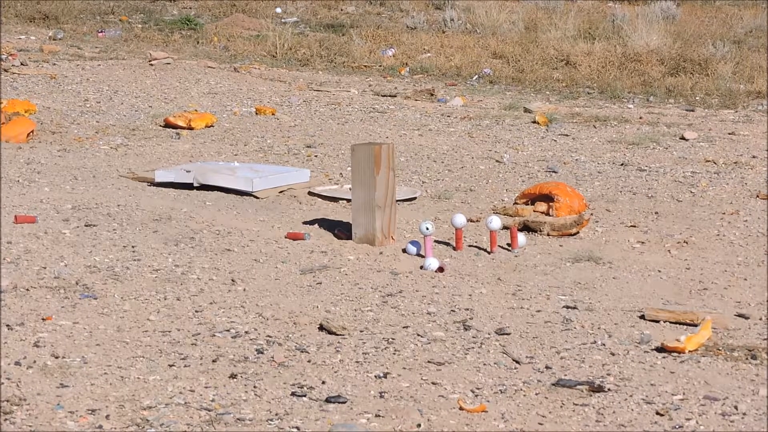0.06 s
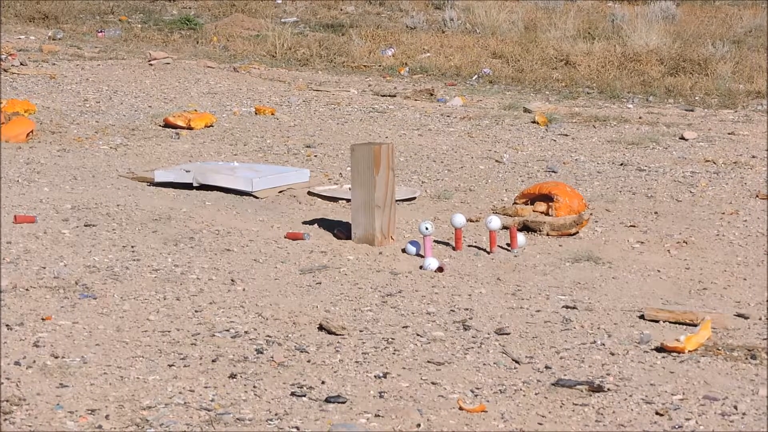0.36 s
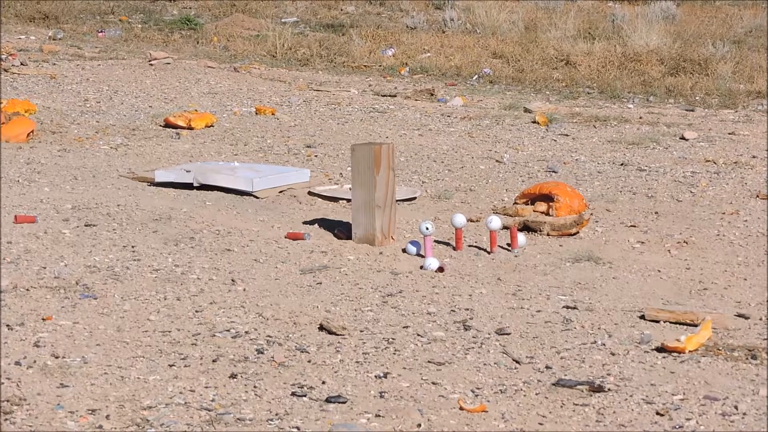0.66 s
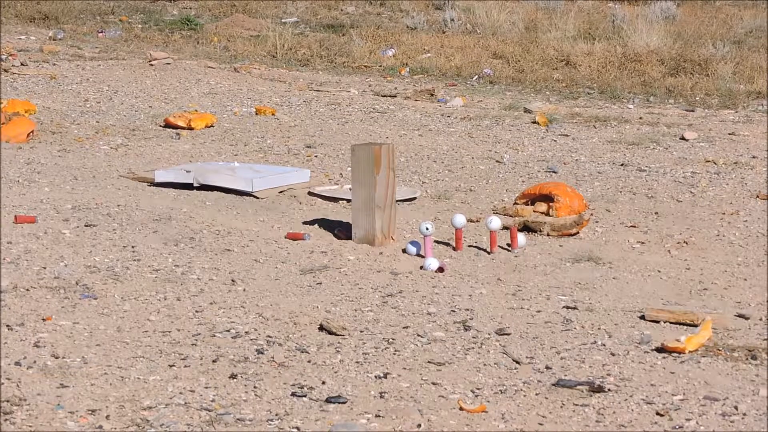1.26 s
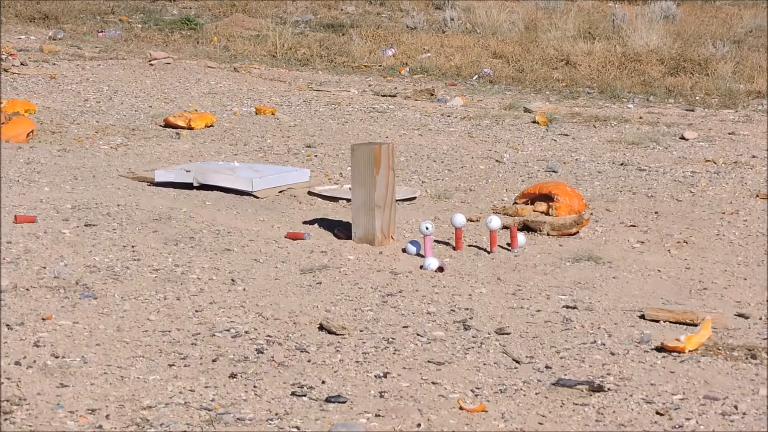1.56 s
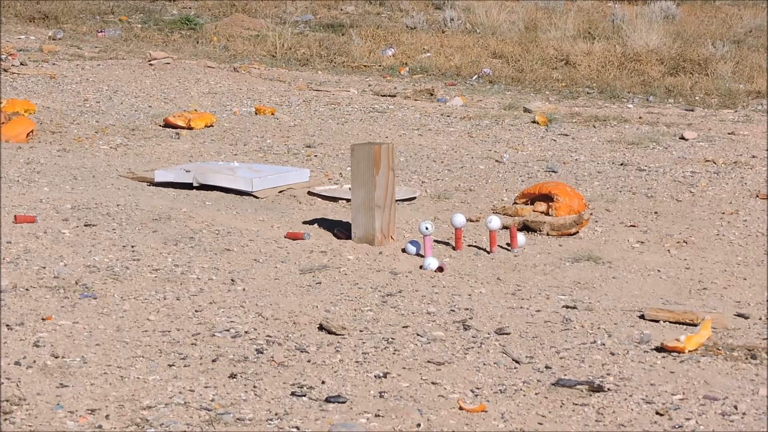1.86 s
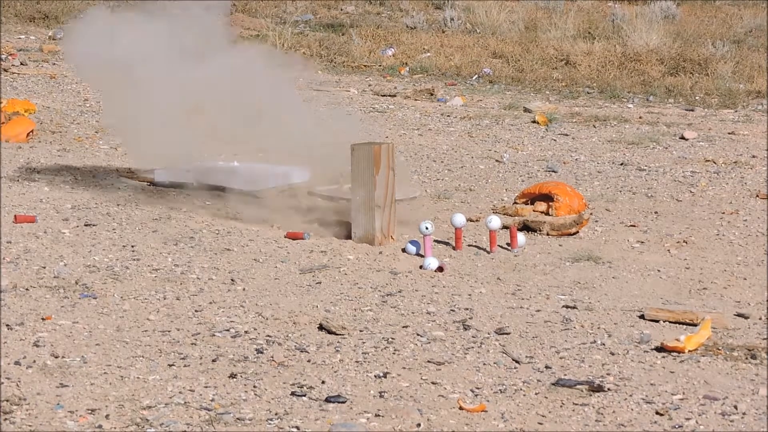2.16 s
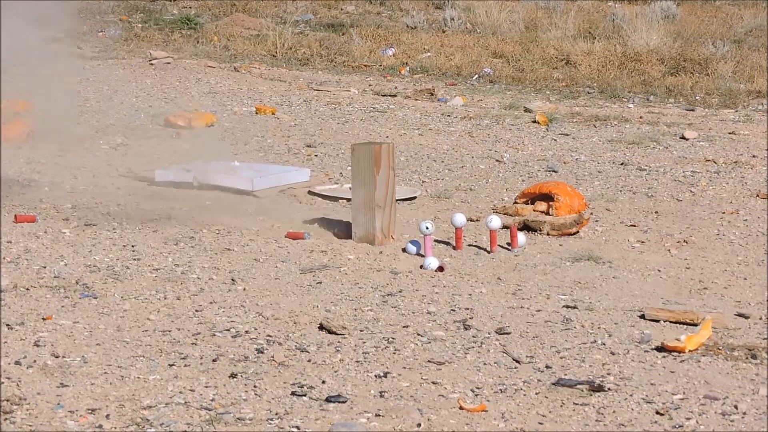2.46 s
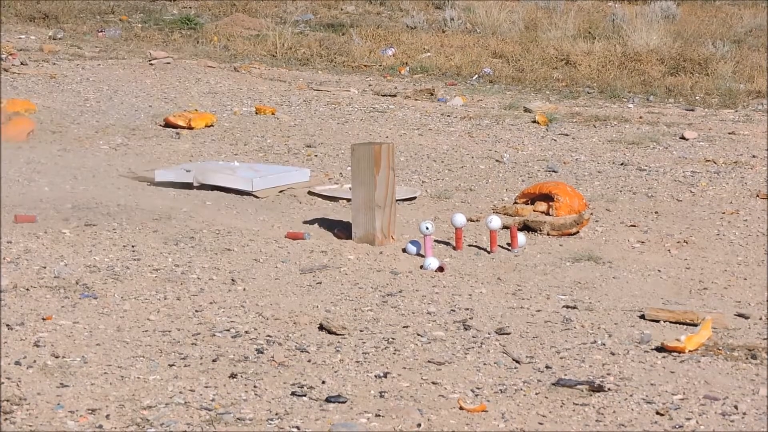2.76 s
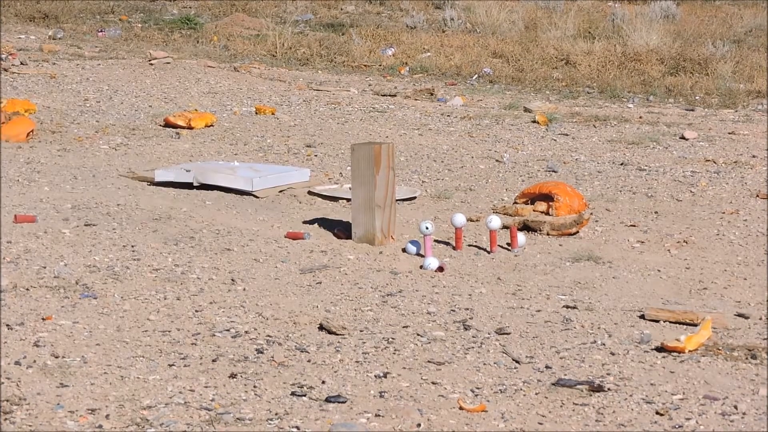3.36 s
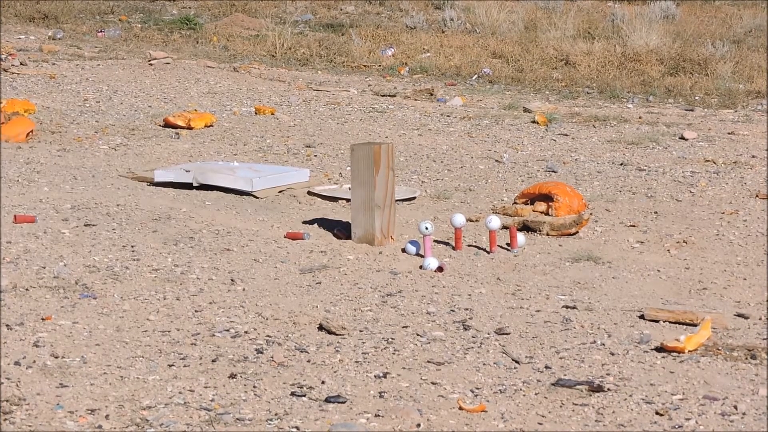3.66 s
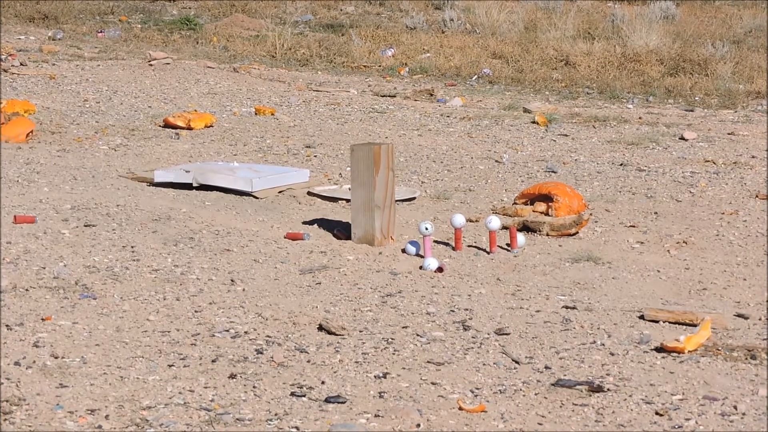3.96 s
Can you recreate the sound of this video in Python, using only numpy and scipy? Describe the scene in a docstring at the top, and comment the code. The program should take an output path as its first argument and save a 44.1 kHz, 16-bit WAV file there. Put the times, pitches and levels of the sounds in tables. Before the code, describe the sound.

A single sharp gunshot cracks outdoors, with wind buffeting the microphone and a brief ricochet whine.

```python
"""One gunshot on an open dirt range, with wind buffeting both microphone ports.
It opens in slow motion, a deep muffled rumble, and after a short gap clicks into full-speed wind.
At about 2 s the blast's pressure wave overloads the microphone, and the hit cracks in the dirt.
The ground reverberates, tumbling fragments whine away and grit ticks down. The slopes return
ever duller echoes, and the wind crackles on to the end."""
import sys
import numpy as np
from scipy import signal
from scipy.fft import rfft, irfft
from scipy.io import wavfile

SR = 44100
rng = np.random.default_rng(int(sys.argv[2]) if len(sys.argv) > 2 else 0)


def master_out(mix):
    """Clip the mix to full scale and print it as 16-bit PCM to the path in sys.argv[1]."""
    frames = np.transpose(np.atleast_2d(mix))
    ceiling = np.clip(frames, -1, 1)
    pcm = np.round(ceiling * 32767).astype(np.int16)
    wavfile.write(sys.argv[1], SR, pcm)


N = 176400
T = np.arange(N) / SR
FREQS = np.maximum(np.arange(N // 2 + 1) * SR / N, 1)
SLOW_END_S, FULL_SPEED_S = 1.597, 1.63
SHOT_S, IMPACT_S = 2.0557, 2.0772

# hiss of the open air: frequency_hz, density_db
HISS_SPECTRUM = [(1000, -92), (3000, -102), (10000, -110.5), (15500, -117)]
# slowed air at the left and right port: frequency_hz, density_db
SLOW_LEFT_SPECTRUM = [(22, -44), (48, -67.5), (160, -74), (400, -90.5), (1700, -101), (4000, -135)]
SLOW_RIGHT_SPECTRUM = [(20, -24), (38, -37.5), (65, -64), (110, -70), (400, -85.5), (2300, -107),
                       (4000, -135)]
# swell of the slowed rumble on the right: time_s, gain_db
SLOW_RIGHT_GAIN = [(.68, -6), (.76, 4), (1.1, -3)]
# slowed, dull ticks: start_s, level_db, decay_s
DULL_TICKS = [(.718, -54, .004), (0.801, -58, .008), (1.378, -45, 0.016), (1.540, -55.5, 0.0045)]
# their resonances: frequency_hz, gain_db
DULL_TICK_COLOUR = [(250, -14.5), (520, 4.5), (750, -10), (1650, -0.5), (2000, -15.5), (2800, -42.5)]
# turbulence at relative speed 1, before each port's gain: frequency_hz, density_db
WIND_SPECTRUM = [(15, -47), (80, -36.5), (190, -38.5), (450, -47), (700, -63.5), (1000, -75), (1500, -94.5),
                 (4000, -130)]
# wind at each port: time_s, relative_speed
LEFT_WIND_SPEED = [(1.63, 0.24), (2, 0.39), (2.45, 0.44), (2.8, 0.27), (3.08, 0.44), (3.52, 0.18),
                   (3.88, 0.53)]
RIGHT_WIND_SPEED = [(1.63, 1.033), (1.72, 0.89), (1.96, 1.124), (2.05, 1.04), (2.2, 0.92), (2.52, 0.79),
                    (2.77, 1.002), (3.04, 0.84), (3.14, 0.67), (3.4, 0.47), (3.44, 0.93), (3.5, 0.85),
                    (3.85, 0.92)]
# buffets on the left port: centre_s, added_relative_speed
LEFT_BUFFETS = [(2.304, 0.45), (2.465, 0.82), (2.535, 0.5), (2.62, 0.38), (3.058, 0.97), (3.892, 0.46)]
# strongest crackles of the wind: centre_s, level_db, spread_s
WIND_CRACKLES = [(1.663, -40, .003), (1.788, -45, 0.0036), (1.966, -40.5, .004), (2.857, -40.5, .002),
                 (3.438, -38.5, 0.0036), (3.461, -38, .0006), (3.560, -41, .0006), (3.657, -40.5, 0.00055),
                 (3.773, -41, 0.00067), (3.938, -40, .0006)]
# colour of the wind's crackle: frequency_hz, gain_db
WIND_CRACKLE_COLOUR = [(850, 3.5), (1450, -4.5), (2000, -14), (2900, -35), (6000, -58)]
# reflections from the slopes: centre_s, level_db, spread_s
SLOPE_ECHOES = [(2.26, -54.5, .07), (2.422, -51.5, 0.042), (2.57, -56, 0.049), (2.805, -55.5, 0.02),
                (2.885, -51.5, 0.016), (3.035, -54.5, 0.032), (3.109, -54, 0.04)]
# colour of an echo before the air dulls it, and of the ground's scatter: frequency_hz, gain_db
SLOPE_COLOUR = [(500, -4), (1400, 2), (3200, -0.5), (5000, -21), (15000, -47)]
GROUND_COLOUR = [(200, -9.5), (900, 6), (3800, -1), (6000, -9.5), (13000, -11), (15500, -17)]
# grit and fragments landing: start_s, level_db, decay_s, left_minus_right_db
LANDINGS = [(2.262, -37, 0.0049, -12.5), (2.541, -51.5, 0.0035, 3)]
# colour of falling grit: frequency_hz, gain_db
GRIT_COLOUR = [(1500, -19), (4500, 2), (8000, -5), (11500, 4), (15500, -3.5)]
# whine of the strongest fragment: time_s, pitch_hz, level_db
WHINE_PATH = [(2.09, 1746, -41), (2.18, 1820, -42.5), (2.3, 1765, -51), (2.48, 1564, -62),
              (2.75, 1324, -65.5), (2.85, 1235, -85)]
# fragments relative to that whine: pitch_ratio, gain_db, sag_per_s, fading_db_per_s
FLYING_FRAGMENTS = [(1, 0, 0, 0), (.845, -5.5, .33, 10), (1.86, -10, .18, 30)]
# colour of the hit and of the blast's edge and crackle: frequency_hz, gain_db
HIT_COLOUR = [(1500, -16), (3000, -2.5), (5500, 4), (8500, -6.5), (11500, 1), (15500, -11.5)]
BLAST_COLOUR = [(1000, -5.5), (1450, -10), (1900, -0.5), (3200, 1), (6500, -0.5), (9000, -9), (11500, -2),
                (15500, -3)]


def amp(db):
    """Decibels to amplitude ratio."""
    return 10 ** (np.asarray(db) / 20)


def curve(rows, column=1):
    """Linear interpolation of a table column in time."""
    rows = np.array(rows)
    return np.interp(T, rows[:, 0], rows[:, column])


def spectrum(points, hz):
    """Frequency response: a table's gain, interpolated in log frequency."""
    points = np.array(points)
    return amp(np.interp(np.log(hz), np.log(points[:, 0]), points[:, 1]))


def coloured(x, points, pitch=1):
    """Filtering by a colour shifted by a pitch ratio; white noise keeps its power."""
    colour = spectrum(points, FREQS / pitch)
    return irfft(rfft(x) * colour, N) / np.sqrt(np.mean(colour ** 2))


def air(points):
    """Noise of a given spectral density (power per Hz, in dB)."""
    return irfft(rfft(rng.standard_normal(N)) * spectrum(points, FREQS), N) * np.sqrt(SR / 2)


def noise(points, shared=0.72):
    """Partial coherence: stereo noise of rms 1, with a share of its power common to both ports."""
    x = np.sqrt(shared) * air(points) + np.sqrt(1 - shared) * np.array([air(points), air(points)])
    return x / x.std()


def flutter(rate_hz):
    """Random modulation: low-passed noise of standard deviation 1."""
    x = irfft(rfft(rng.standard_normal(N)) / (1 + (FREQS / rate_hz) ** 4), N)
    return x / x.std()


def pan(db):
    """Level difference, left minus right, as two gains."""
    return amp(np.array([[db], [-db]]) / 2)


def burst(start_s, decay_s, hold_s=0):
    """Exponential decay after a sudden onset and a hold."""
    return (T >= start_s) * np.exp(-np.maximum(T - start_s - hold_s, 0) / decay_s)


def swell(centre_s, spread_s):
    """Gaussian rise and fall."""
    return np.exp(-.5 * ((T - centre_s) / spread_s) ** 2)


def distant_hiss():
    """Ambient noise, incoherent between the ports, swells once."""
    return np.array([air(HISS_SPECTRUM), air(HISS_SPECTRUM)]) * amp(3.5 * swell(3.34, .13))


def slow_motion():
    """Slowing lowers frequency: wind rumbles over a hollow rush, a low drone and dull ticks."""
    rumble = np.array([air(SLOW_LEFT_SPECTRUM), air(SLOW_RIGHT_SPECTRUM) * amp(curve(SLOW_RIGHT_GAIN))])
    rush = noise([(90, -20.5), (150, 21), (260, 14), (450, -43.5)]) * amp(-52.5) * swell(.32, .24)
    drone_hz = 70 + 2 * flutter(8.8)
    drone = amp(-36) * np.sin(2 * np.pi * np.cumsum(drone_hz) / SR) * swell(1.23, .26)
    ticks = rng.standard_normal((2, N)) * sum(amp(db) * burst(s, decay) for s, db, decay in DULL_TICKS)
    return rumble + rush + drone + coloured(ticks, DULL_TICK_COLOUR)


def port_wind(speed, eddy_octaves, gain_db):
    """Turbulence at one port: faster air is brighter and louder, and eddies shake its speed."""
    speed = speed * 2 ** (eddy_octaves * flutter(39))
    source = rfft(rng.standard_normal(N)) * np.sqrt(SR / 2)
    pressure = 0
    for hz in 16 * 2 ** np.arange(0, 8.5, 1 / 3):
        third_octave = np.maximum(1 - 3 * abs(np.log2(FREQS / hz)), 0)
        pressure += irfft(source * third_octave, N) * spectrum(WIND_SPECTRUM, hz / speed)
    return pressure * amp(gain_db + np.log2(speed))  # 1 dB more per doubling of speed


def wind_crackle(speed):
    """Intermittent turbulence: crackle grows as speed cubed; shorter spurts are brighter."""
    white = rng.standard_normal(N)
    crackle = coloured(white * amp(-61.5 + 6.5 * flutter(140)) * speed ** 3, WIND_CRACKLE_COLOUR)
    for s, db, spread in WIND_CRACKLES:
        spurt = white * amp(db) * swell(s, spread)
        crackle += coloured(spurt, WIND_CRACKLE_COLOUR, pitch=(.0034 / spread) ** .15)
    return crackle * pan(-12)


def wind():
    """Flow noise: the right port faces the wind, the left is sheltered; one eddy thumps on both."""
    left_speed = curve(LEFT_WIND_SPEED) + sum(more * swell(s, .0061) for s, more in LEFT_BUFFETS)
    right_speed = curve(RIGHT_WIND_SPEED)
    left = port_wind(left_speed, eddy_octaves=.28, gain_db=-1)
    right = port_wind(right_speed, eddy_octaves=.13, gain_db=.3)
    thump = -amp(-9) * swell(2.408, .003)
    return np.array([left, right]) + wind_crackle(right_speed) + thump


def slope_echoes():
    """Reflection and air absorption: the slopes return the shot, duller the later it comes."""
    scatter = (rng.standard_normal((2, N)) + rng.standard_normal(N)) / np.sqrt(2)
    scatter *= amp(2.2 * flutter(60))
    dulling_octaves_per_s = .54
    echoes = 0
    for s, db, spread in SLOPE_ECHOES:
        pitch = 2 ** (-dulling_octaves_per_s * (s - IMPACT_S))
        echoes += coloured(scatter * amp(db) * swell(s, spread), SLOPE_COLOUR, pitch)
    return echoes * pan(2.5)


def ground_reverberation():
    """Scattering from the nearby ground: a fast decay with a faint, longer tail."""
    envelope = amp(-12.5) * burst(IMPACT_S, .016) + amp(-34.5) * burst(IMPACT_S, .08)
    return noise(GROUND_COLOUR, shared=.3) * envelope * pan(1.4)


def debris():
    """Small impacts: single bits tick down amid a fine spray of sand."""
    ticks = sum(amp(db) * burst(s, decay) * pan(side_db) for s, db, decay, side_db in LANDINGS)
    sand = amp(-66 + 6.5 * flutter(300)) * swell(2.4, .056)
    return noise(GRIT_COLOUR) * (ticks + sand)


def ricochet():
    """Aerodynamic tones: tumbling fragments whine and drop in pitch as they fly off."""
    flight_s = np.maximum(T - IMPACT_S, 0)
    in_flight = (T > IMPACT_S) * (T < WHINE_PATH[-1][0])
    tones = 0
    for ratio, db, sag, fading in FLYING_FRAGMENTS:
        hz = curve(WHINE_PATH) * ratio * np.exp(-sag * flight_s) * (1 + .003 * flutter(90))
        gain = amp(db - fading * flight_s + 1.17 * flutter(30))
        tones += gain * np.sin(2 * np.pi * np.cumsum(hz) / SR)
    return np.sqrt(2) * tones * amp(curve(WHINE_PATH, column=2)) * in_flight * pan(3.3)


def dirt_hit():
    """Impact noise: the hit makes two broadband cracks a millisecond apart."""
    cracks = amp(4) * burst(IMPACT_S, .001) + amp(6.5) * burst(IMPACT_S + .001, .0011)
    return noise(HIT_COLOUR, shared=.8) * cracks * pan(1.5)


def pressure_wave(arrival_s):
    """Transient oscillation: the blast's pressure swings briefly at two pitches."""
    low_hz, high_hz = 520, 938
    phase_per_hz = 2 * np.pi * (T - arrival_s)
    swing = np.sin(low_hz * phase_per_hz) + amp(-5) * np.sin(high_hz * phase_per_hz)
    return -amp(12.5) * swing * burst(arrival_s, .00013, hold_s=.0037)


def blast():
    """Propagation delay: the wave reaches the right port later; its sharp edge trails into crackle."""
    port_lag_s = .0004
    wave = np.array([pressure_wave(SHOT_S), pressure_wave(SHOT_S + port_lag_s)])
    edge = amp(9) * burst(SHOT_S, .0015, hold_s=.0018)
    crackle = amp(-4.5) * burst(SHOT_S, .004, hold_s=IMPACT_S - SHOT_S)
    return wave + noise(BLAST_COLOUR, shared=.16) * (edge + crackle) * pan(-5.5)


def scene():
    """Superposition: slow motion, a short silence, then with a click the range at full speed."""
    full_speed = (wind() + distant_hiss() + blast() + dirt_hit()
                  + slope_echoes() + ground_reverberation() + ricochet() + debris())
    fade_s = .003
    slow_gate = np.clip(np.minimum(T, SLOW_END_S - T) / fade_s, 0, 1)
    full_speed_gate = np.clip((T - FULL_SPEED_S) / fade_s, 0, 1)
    click = noise(HISS_SPECTRUM) * amp(-42.5) * burst(FULL_SPEED_S, fade_s / 2)
    return slow_motion() * slow_gate + click + full_speed * full_speed_gate


def record(dry):
    """Compression and saturation: the gain ducks and recovers, peaks clip and the top is cut."""
    threshold_db, recovery_s, top_hz = -7.5, .047, 15600
    pole = np.exp(-1 / (recovery_s * SR))
    power = signal.lfilter([1 - pole], [1, -pole], np.mean(dry ** 2, axis=0))
    ducked = dry / np.sqrt(1 + power / amp(threshold_db) ** 2)
    lowpass = signal.ellip(8, .2, 70, top_hz, fs=SR, output="sos")
    return signal.sosfilt(lowpass, np.clip(ducked, -1, 1))


dry = scene()
out = record(dry)
master_out(out)
```